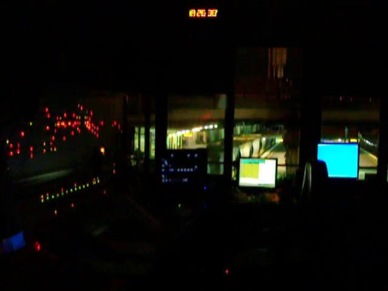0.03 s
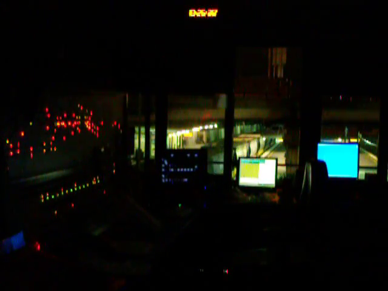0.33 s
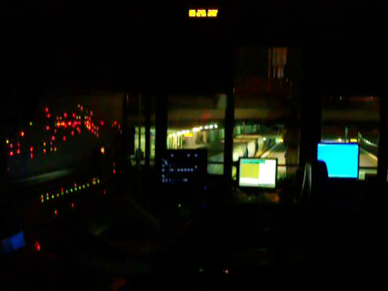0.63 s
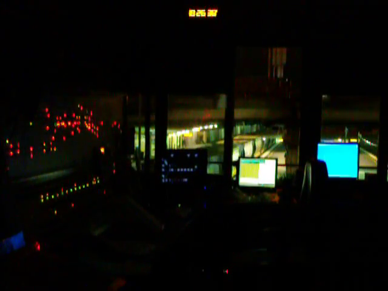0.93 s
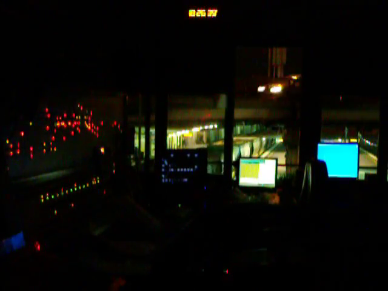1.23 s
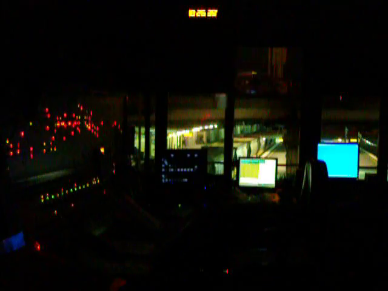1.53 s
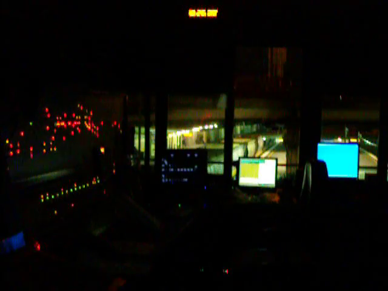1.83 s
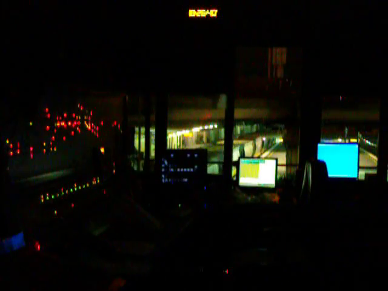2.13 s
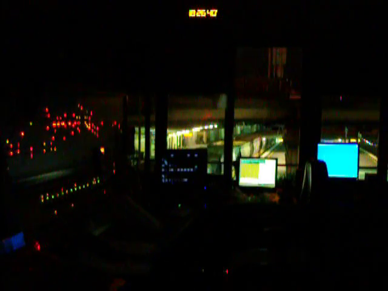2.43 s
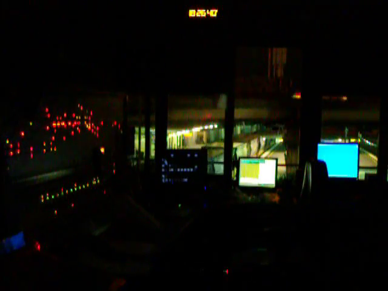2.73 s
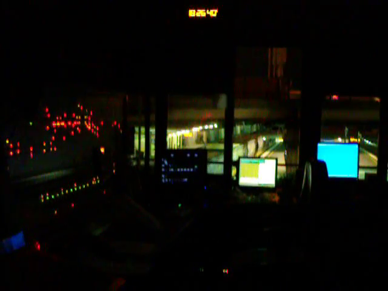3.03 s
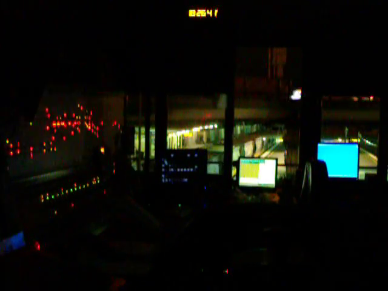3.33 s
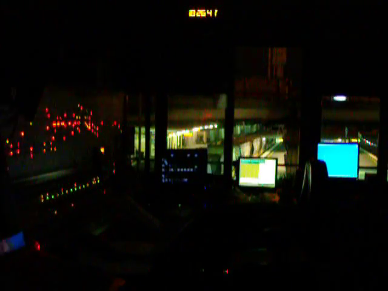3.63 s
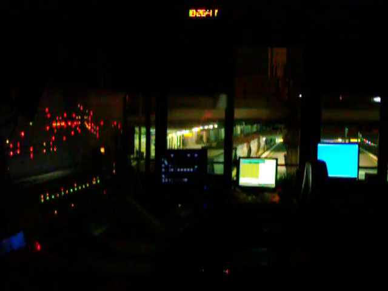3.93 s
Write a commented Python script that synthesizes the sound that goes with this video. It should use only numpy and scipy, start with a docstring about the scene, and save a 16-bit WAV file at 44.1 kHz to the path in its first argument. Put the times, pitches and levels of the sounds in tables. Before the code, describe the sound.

Train wheels clatter loudly over a rail joint above a steady low rumble, heard from indoors. Groups of five cracking, ringing, booming blows start at about 0, 1.3 and 2.5 seconds, each ending in a brief rattle of loose steel. A fourth group begins near 3.7 seconds as the rolling roar swells. The hardest blows overload the microphone, and the highest treble is missing.

```python
"""Indoors at night, within earshot of a train: groups of five axles cross a rail joint every 1.2 s.
Rolling contact makes a steady rumble. Each impact cracks, excites the modes of the steel wheels
and booms through the frame and car body; loose steel chatters after each full group.
The blows saturate the signal of a narrow-band microphone, and its overshoots clip digitally."""
import sys
import numpy as np
from scipy import signal
from scipy.fft import rfft, irfft
from scipy.io import wavfile

SR = 44100
rng = np.random.default_rng(int(sys.argv[2]) if len(sys.argv) > 2 else 0)


def generate_wav(signal):
    """Clip the signal to [-1, 1] and save it as 16-bit WAV at the path in sys.argv[1]."""
    frames = np.transpose(np.atleast_2d(signal))
    scaled = np.clip(frames, -1, 1) * 32767
    pcm = np.round(scaled).astype(np.int16)
    wavfile.write(sys.argv[1], SR, pcm)


N = 176400

# spectra of rumble, roar, crack and boom (frequency [Hz], relative spectral density [dB])
RUMBLE_SPECTRUM = [(12, -22), (27, 2.5), (45, -7), (60, -20.5), (82, -2.5), (102, -9), (130, 1), (170, 2.5),
                   (220, -1.5), (320, -2), (440, 2), (540, -8.5), (760, -8), (1200, -12.5), (1800, -9),
                   (2300, -11.5), (2800, -13), (4000, -14), (5000, -16), (5600, -17)]
MIDRANGE_SPECTRUM = [(300, -30.5), (520, -2), (740, -1.5), (1000, -6), (1600, -18), (4000, -24.5)]
CRACK_SPECTRUM = [(100, -19), (500, -7), (1200, -7.5), (1800, -1), (2300, -2), (2700, -2.5), (3300, -3.5),
                  (3900, -0.5), (4500, -3), (5100, 0), (5600, -4)]
BOOM_SPECTRUM = [(40, -16), (110, -32), (200, -13), (290, -9), (370, -12.5), (450, -12.5), (540, -18),
                 (800, -9), (1100, -11.5), (1800, -11), (3000, -15), (5200, -21.5)]
# envelope of the midrange roar (time [s], level [dB])
ROAR_ENVELOPE = [(0, -22.5), (1.1, -24.5), (2.3, -21.5), (3.0, -28.5), (3.55, -17.5), (4, -18)]
# axle impacts, in relative terms (time [s], crack [dB], boom [dB], ring [dB], decay time factor [1])
IMPACTS = [(.053, 3, -1, 3.5, 0.8), (.219, -3.5, -1, -3, 1), (.421, -6, 2.5, -2, 1),
           (.582, -2.5, 2, -27, 0.99), (0.815, -7.5, -2, -30, 0.38), (1.274, 2, 1.5, -3, 0.83),
           (1.437, -3, -1.5, -4, 0.98), (1.634, -3, 2.5, -24, 1), (1.796, -2.5, -1, -6, 1),
           (2.029, -8.5, -3, -38, 0.41), (2.483, 4.5, -2, 4, 0.78), (2.643, -6, 1.5, 1, 1),
           (2.844, -2, 2, -4, 0.88), (3.003, -4, 3, -8, 0.95), (3.227, -6.5, -4.5, -12, 0.6),
           (3.681, 2, -2, -11, 0.87), (3.842, -5, -1.5, -11, 1)]
# wheel and rail modes (frequency [Hz], bandwidth [Hz], gain when shaken [dB], gain when struck [dB])
STEEL_MODES = [(1700, 50, -2.5, -8), (1959, 45, -4, 2), (2115, 60, -8, -10), (2590, 110, -4, -9),
               (2801, 32, -7.5, -10), (3058, 35, -12, -14), (3720, 30, -9, -10), (3857, 28, -7.5, -8),
               (4974, 55, -6, -6)]
# frame modes (frequency [Hz], bandwidth [Hz], gain [dB])
FRAME_MODES = [(320, 55, -3), (371, 42, 0), (425, 48, -1.5), (702, 35, -11), (800, 60, -8)]
# bursts of loose steel (time [s], relative level [dB], duration [s])
CHATTER_BURSTS = [(0.841, 1.5, 0.07), (2.091, -2.5, 0.082), (3.288, 2, 0.049)]
# digital overflow wraparounds, each a brief reversal of sign (time [s])
WRAPAROUNDS = [2.4906, 2.4985]

RUMBLE_DB, SWELL_DB, SWELL_HZ = -13, 1.06, 10.4
CRACK_DB, CRACK_RISE_S, CRACK_T60_S = -0.5, 0.006, 0.89
RATTLE_DB, RATTLE_HZ = 0.33, 70
STEEL_DB, ROLLING_DRIVE_DB = -14.5, -29
CLANG_DB, CLANG_T60_S, KNOCK_DB, KNOCK_T60_S, STRIKE_SPREAD_DB = -10.5, 0.19, -13, 0.3, 1
BOOM_DB, FRAME_DB, BOOM_RISE_S, BOOM_T60_S = -7, -13, 0.015, 1.17
CHATTER_HZ, CHATTER_WIDTH_HZ, CHATTER_RING_DB, CHATTER_NOISE_DB = 1725, 70, -19, -13
INPUT_EDGE_HZ, MIC_EDGE_HZ, MIC_ORDER, MIC_STOP_HZ, OUTPUT_EDGE_HZ = 5920, 5216, 11.4, 6150, 15800
SATURATION, KNEE_EXPONENT, CEILING, WRAP_S = 0.91, 4.92, 0.74, 0.00003


def amp(db):
    """Amplitude ratio of a level in decibels."""
    return 10 ** (np.asarray(db) / 20)


def unit(x):
    """Normalisation to an rms of 1."""
    return x / np.sqrt(np.mean(x ** 2) + 1e-20)


def bins():
    """Fourier frequencies of the whole signal, in Hz."""
    return np.arange(N // 2 + 1) * SR / N


def noise(spectrum):
    """Spectral shaping: white noise takes on the given spectrum, at unit rms."""
    hz, db = np.transpose(spectrum)
    gain = amp(np.interp(np.log(bins() + 1), np.log(hz), db))
    return unit(irfft(rfft(rng.standard_normal(N)) * gain, N))


def wander(rate_hz):
    """Low-pass noise: a random drift of unit rms, mostly slower than the given rate."""
    return unit(irfft(rfft(rng.standard_normal(N)) / (1 + (bins() / rate_hz) ** 2), N))


def resonate(x, hz, width_hz):
    """Forced response of one damped mode; white noise keeps its rms."""
    pole_radius = np.exp(-np.pi * width_hz / SR)
    pole = pole_radius * np.exp(2j * np.pi * hz / SR)
    return np.sqrt(2 * (1 - pole_radius ** 2)) * signal.lfilter([1], [1, -pole], x).real


def lowpass(x, hz, taps):
    """Band limiting by a steep windowed-sinc filter."""
    return signal.oaconvolve(x, signal.firwin(taps, hz, window=("kaiser", 9), fs=SR)[None], "same")


def impact_envelope(levels_db, rise_s, t60_s):
    """Incoherent addition: each impact's vibration rises and decays, and their powers sum."""
    t, power = np.arange(N) / SR, np.zeros(N)
    for (start, *_, decay_factor), db in zip(IMPACTS, levels_db):
        age = np.maximum(t - start, 0)
        rise = np.minimum(age / rise_s, 1)
        power += (rise * amp(db - 60 * age / (t60_s * decay_factor))) ** 2
    return np.sqrt(power)


def struck(levels_db, modes, rise_s, t60_s):
    """Free vibration: each impact starts damped sinusoids of random phase and slightly varied level."""
    t, out = np.arange(SR // 2) / SR, np.zeros(N + SR)
    envelope = np.minimum(t / rise_s, 1) * amp(-60 * t / t60_s)
    for (start, *_), level in zip(IMPACTS, levels_db):
        at = round(start * SR)
        for hz, *_, db in modes:
            gain = amp(level + db + STRIKE_SPREAD_DB * rng.standard_normal())
            out[at:at + len(t)] += gain * envelope * np.sin(2 * np.pi * (hz * t + rng.random()))
    return out[:N]


def rolling():
    """Rolling contact of wheel on rail radiates an uneven rumble and a roar that swells and ebbs."""
    roar_db = np.interp(np.arange(N) / SR, *np.transpose(ROAR_ENVELOPE))
    roar = amp(roar_db) * noise(MIDRANGE_SPECTRUM)
    swell = amp(SWELL_DB * wander(SWELL_HZ))
    return swell * (amp(RUMBLE_DB) * noise(RUMBLE_SPECTRUM) + roar)


def wheel_cracks():
    """Broadband excitation: each impact cracks and shakes the steel modes; rolling keeps them ringing."""
    envelope = impact_envelope([crack for _, crack, *_ in IMPACTS], CRACK_RISE_S, CRACK_T60_S)
    force = envelope * amp(RATTLE_DB * wander(RATTLE_HZ))
    drive = (force + amp(ROLLING_DRIVE_DB)) * rng.standard_normal(N)
    ring = sum(amp(db) * resonate(drive, hz, width) for hz, width, db, _ in STEEL_MODES)
    return amp(CRACK_DB) * force * noise(CRACK_SPECTRUM) + amp(STEEL_DB) * ring


def joint_clangs():
    """Impulse response: the rail end strikes the wheel, which rings, and jolts the frame, which knocks."""
    clang = struck([ring for *_, ring, _ in IMPACTS], STEEL_MODES, CRACK_RISE_S, CLANG_T60_S)
    knock = struck([boom for _, _, boom, *_ in IMPACTS], FRAME_MODES, BOOM_RISE_S, KNOCK_T60_S)
    return amp(CLANG_DB) * clang + amp(KNOCK_DB) * knock


def body_boom():
    """Structure-borne sound: frame and car body boom, rising and fading more slowly than the crack."""
    envelope = impact_envelope([boom for _, _, boom, *_ in IMPACTS], BOOM_RISE_S, BOOM_T60_S)
    ring = sum(amp(db) * resonate(rng.standard_normal(N), hz, width) for hz, width, db in FRAME_MODES)
    return envelope * (amp(BOOM_DB) * noise(BOOM_SPECTRUM) + amp(FRAME_DB) * ring)


def steel_chatter():
    """Random forcing: loose steel buzzes briefly at one resonance, with broadband noise around it."""
    t = np.arange(N) / SR
    force = sum(amp(db) * np.sin(np.pi * np.clip((t - start) / duration, 0, 1))
                for start, db, duration in CHATTER_BURSTS)
    ring = resonate(force * rng.standard_normal(N), CHATTER_HZ, CHATTER_WIDTH_HZ)
    return amp(CHATTER_RING_DB) * ring + amp(CHATTER_NOISE_DB) * force * noise(CRACK_SPECTRUM)


def scene():
    """Superposition: the sound pressures of all sources add in one channel."""
    return (rolling() + wheel_cracks() + joint_clangs() + body_boom() + steel_chatter())[None]


def record(dry):
    """Overload: the signal saturates, is band-limited and clips digitally; two wraparounds tick."""
    driven = lowpass(dry, INPUT_EDGE_HZ, taps=101)
    saturated = driven / (1 + abs(driven / SATURATION) ** KNEE_EXPONENT) ** (1 / KNEE_EXPONENT)
    mic_response = 1 / np.sqrt(1 + (bins() / MIC_EDGE_HZ) ** (2 * MIC_ORDER))
    narrow = irfft(rfft(saturated) * mic_response, N)
    clipped = np.clip(lowpass(narrow, MIC_STOP_HZ, taps=301), -CEILING, CEILING)
    wrap = sum(np.exp(-((np.arange(N) / SR - at) / WRAP_S) ** 2) for at in WRAPAROUNDS)
    return lowpass(clipped * (1 - 2 * wrap), OUTPUT_EDGE_HZ, taps=511)


dry = scene()
out = record(dry)
generate_wav(out)
```